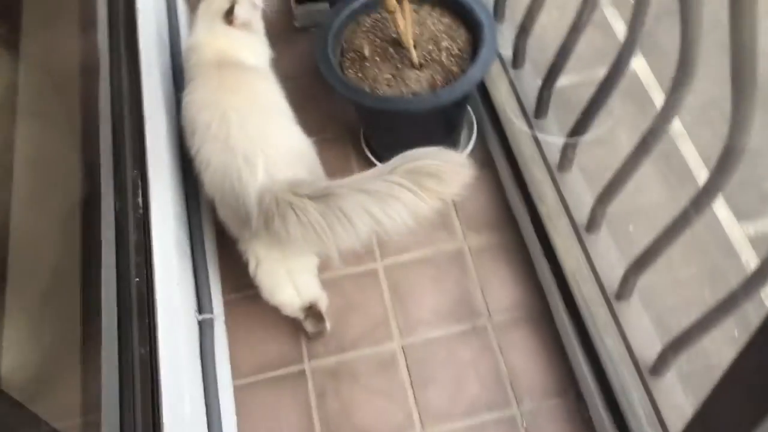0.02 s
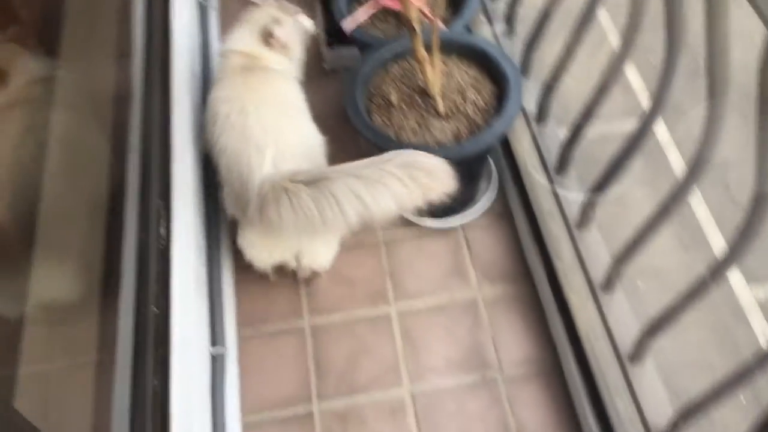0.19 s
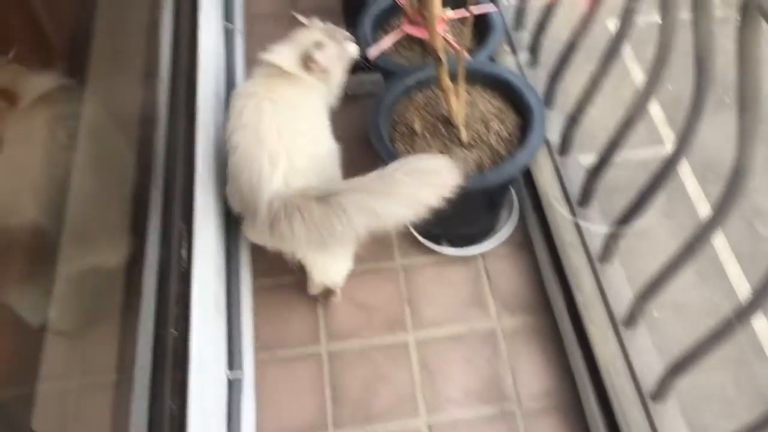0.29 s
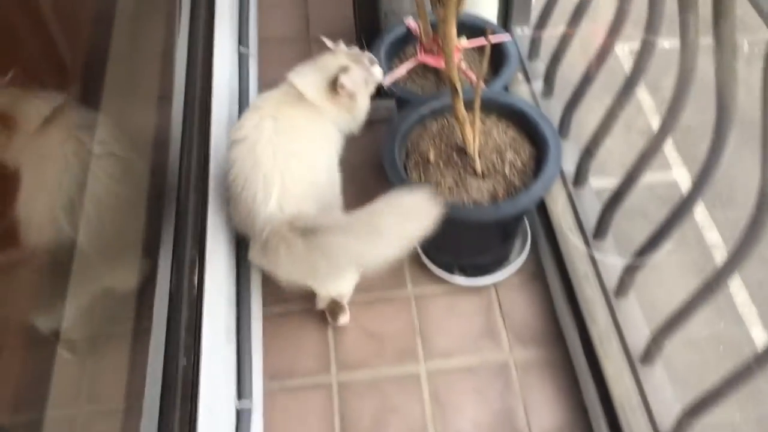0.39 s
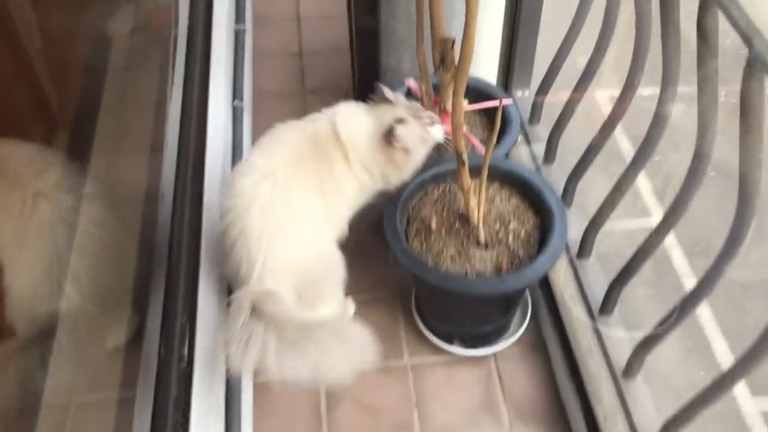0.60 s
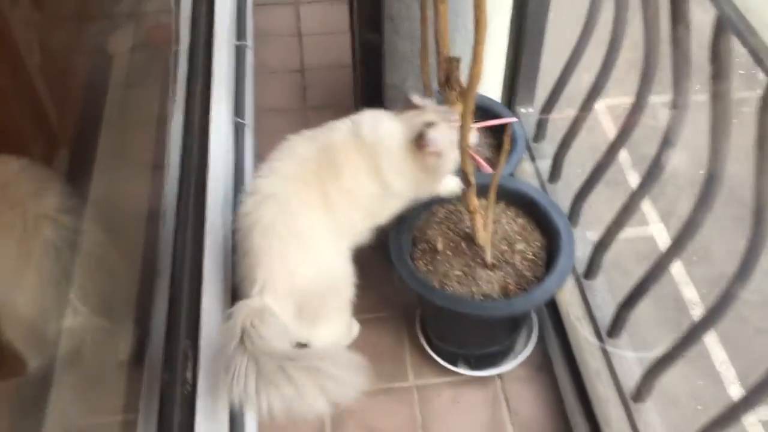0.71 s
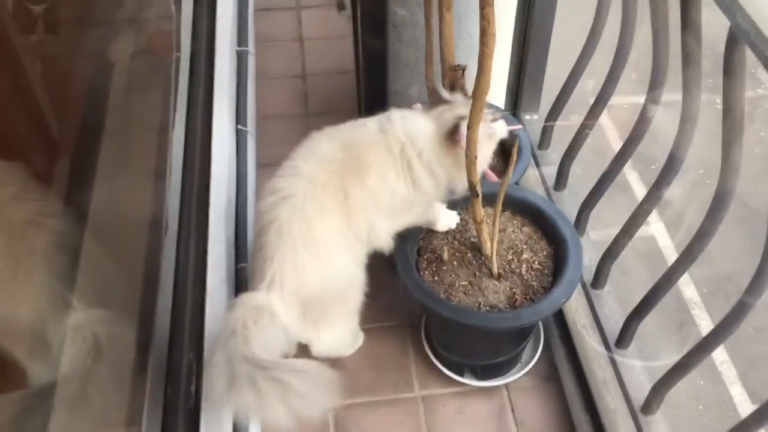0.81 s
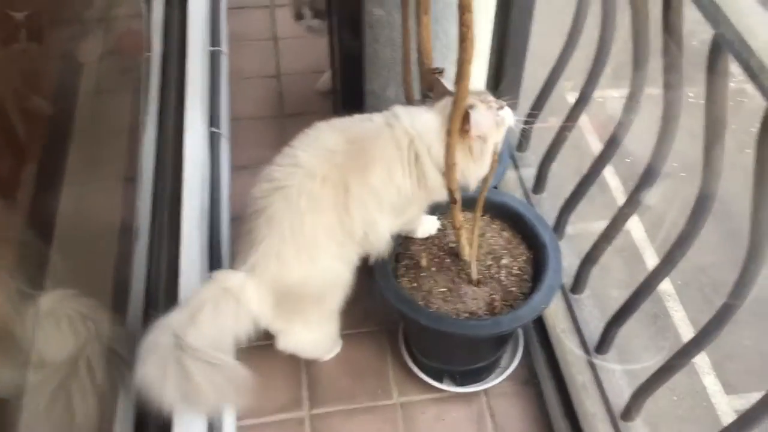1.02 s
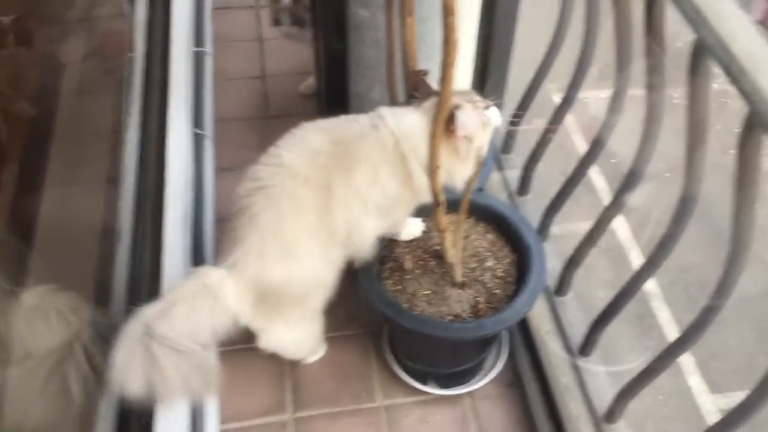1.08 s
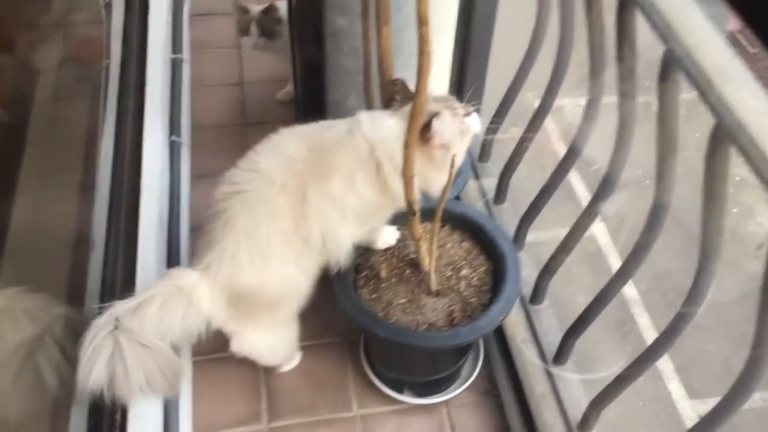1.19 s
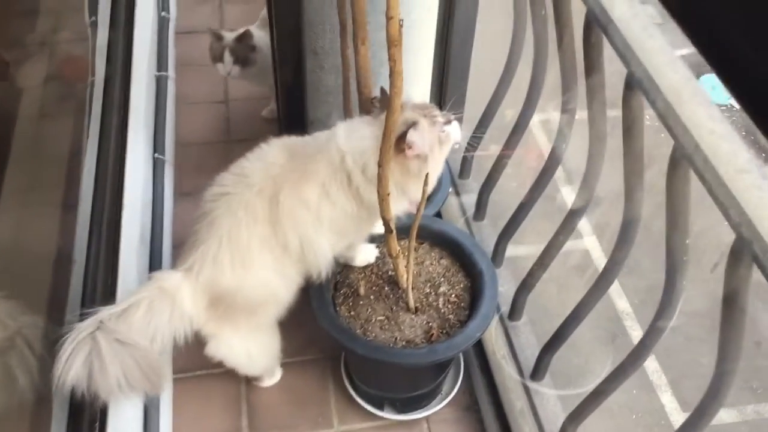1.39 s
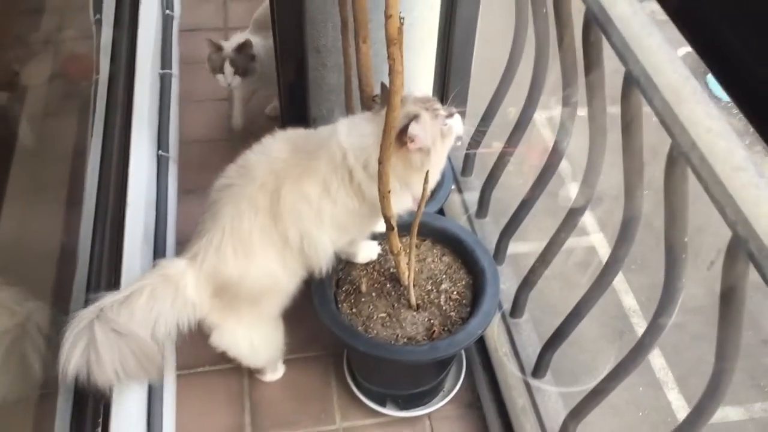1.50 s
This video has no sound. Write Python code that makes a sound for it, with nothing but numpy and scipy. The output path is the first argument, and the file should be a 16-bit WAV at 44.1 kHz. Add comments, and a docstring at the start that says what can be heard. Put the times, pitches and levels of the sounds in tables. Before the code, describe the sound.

A cat meows once from about 0.15 to 0.7 seconds, a gravelly chirp rising into a bright wavering tone. Scuffs on tiles and a tiny tick open the moment. A dull pot knock comes near 0.9, ticks at 1.07, a sharper double knock with a brushing scuff around 1.17, a faint metal railing rattle at 1.3, then tiny ticks. Low outdoor rumble and short balcony echoes throughout.

```python
"""Cat on a tiled balcony

A cat gives one meow: a gravelly rising chirp that clears into a wavering tone, made by adding up
14 harmonics and a thin hiss. Around it come scuffs on the tiles (shaped noise), dull knocks on a
plant pot and light touches on a railing (ringing tones), and ticks of twigs and grit (snaps of noise).
A low outdoor rumble and faint air noise lie underneath. Echoes follow all but the scuffs and outdoors.
"""
import sys
import numpy as np
from scipy import signal
from scipy.fft import rfft, irfft
from scipy.io import wavfile
from scipy.ndimage import uniform_filter1d

SR = 44100
rng = np.random.default_rng(int(sys.argv[2]) if len(sys.argv) > 2 else 0)


def waveform_to_disk(signal):
    """Save audio, clipped to [-1, 1], as 16-bit WAV at the path in sys.argv[1]."""
    frames = np.transpose(np.atleast_2d(signal))
    scaled = np.clip(frames, -1, 1) * 32767
    samples = np.round(scaled).astype(np.int16)
    wavfile.write(sys.argv[1], SR, samples)


N = 66150
T = np.arange(N) / SR  # time of every sample, s

# Colour of the outdoor rumble: [f/Hz, relative level/dB]
RUMBLE_COLOUR = [(20, -14.5), (36, -6.5), (60, 1), (90, -1.5), (125, -8), (190, -19.5), (290, -23.5),
                 (450, -35.5), (1000, -47), (3000, -58)]
# Rumble over time, before its random sway: [t/s, level/dB]
RUMBLE_LEVEL = [(0, -54), (.35, -54.5), (.62, -49.5), (1.3, -51), (1.5, -56)]
# Colour of the faint air noise: [f/Hz, relative level/dB]
AIR_COLOUR = [(100, -9), (500, -3.5), (1200, 0), (2500, -4.5), (4500, -8), (8000, -15), (15500, -19)]
RUMBLE_SWAY_DB, AIR_DB = 1.0, -67.5

# Scuffs on the tiles:
# [start t/s, attack/s, hold/s, time to fall 60 dB/s, level/dB, tilt/dB per octave]
SCUFFS = [(-.02, 0.0074, 0.041, 0.32, -49, 5), (0.044, 0.0077, 0.052, 0.16, -55, 3.5),
          (0.28, 0.016, 0.015, 0.063, -63.5, 7), (0.712, 0.038, 0.045, 0.36, -69, 7),
          (0.83, 0.0089, 0.01, 0.16, -59.5, 2), (0.889, 0.01, 0.063, 0.11, -59, 1),
          (1.049, 0.0042, 0.04, .12, -66, -1.5), (1.173, 0.048, 0.017, .18, -46.5, 6),
          (1.279, 0.0076, 0.025, 0.2, -55.5, -0.5), (1.38, 0.015, 0.016, 0.44, -67.5, 5.5)]
# Colour of the scuffs before the tilt: [f/Hz, relative level/dB]
SCUFF_COLOUR = [(150, 8), (400, -7.5), (900, 2.5), (2000, 7), (3800, -2), (6000, -6), (9000, -12),
                (11000, -17.5), (15500, -20)]

# Light touches on the railing: [t/s, level/dB]
CLINKS = [(1.29, -49), (1.297, -49.5), (1.306, -52.5), (1.321, -59)]
# Ringing tones of the railing: [f/Hz, relative level/dB, time to fall 60 dB/s]
RAIL_TONES = [(1789, 1.5, 0.1), (1865, -10, 0.14), (2143, -2.5, 0.094), (2420, -4.5, 0.046),
              (4000, -2, 0.024)]

# Light ticks of twigs and grit: [t/s, level/dB, centre f/Hz]
TICKS = [(.0563, -48.5, 1570), (0.0565, -43, 3270), (1.0684, -46, 2770), (1.072, -51, 3600),
         (1.0882, -46.5, 3520), (1.345, -55.5, 3330), (1.395, -61, 2870), (1.437, -56.5, 2680),
         (1.482, -65.5, 3070)]
TICK_T60_S, TICK_TAIL_DB, TICK_TAIL_T60_S = .01, -15, .07
TICK_SPREAD = 0.19  # band edges: centre divided and multiplied by 1.19

# Knocks on the plant pot: [t/s, level before softening/dB, softening cut-off f/Hz, pitch ratio]
KNOCKS = [(0.511, -53, 400, 0.73), (0.9073, -42.5, 2810, 0.78), (0.92, -51, 1190, 0.95),
          (1.1714, -36.5, 3430, 1), (1.202, -37.5, 520, 0.95)]
# Ringing tones of the pot at pitch ratio 1: [f/Hz, relative level/dB, time to fall 60 dB/s]
POT_TONES = [(201, -26, 0.049), (282.3, -6, 0.14), (376, 1, 0.048), (437, -0.5, 0.036), (662, -10, 0.082),
             (896, -6.5, 0.027), (1202, -9.5, 0.032), (1500, -3, 0.014), (1980, -3.5, 0.019),
             (2410, -13, 0.012)]
CRACK_DB, CRACK_T60_S = -3.5, 0.055

# Pitch of the meow, before smoothing and jitter: [t/s, f/Hz]
PITCH = [(.15, 285), (.192, 289.8), (.208, 391.5), (.243, 418.8), (.262, 504.6), (.295, 512.5),
         (.314, 577.4), (.358, 581.5), (.386, 611.2), (.412, 578.4), (.446, 610.9), (.46, 588.7),
         (.477, 502.6), (.496, 586), (.511, 603.8), (.537, 552.8), (.58, 569.6), (.605, 600.5),
         (.641, 589.5), (.655, 666)]
# Force of the voice, before VOICE_DB is added: [t/s, level/dB]
EFFORT = [(.13, -67), (.158, -52), (.183, -47), (.205, -48), (.243, -39.5), (.25, -35), (.284, -31.5),
          (.299, -41.5), (.345, -40), (.364, -43.5), (.388, -32), (.413, -41.5), (.448, -29.5), (.475, -42),
          (.518, -27.5), (.555, -35), (.59, -39), (.638, -44), (.668, -61), (.7, -70)]
# The mouth: [t/s, upper edge of the bright range f/Hz, nasal ring level/dB, roughness 0-1]
MOUTH = [(.15, 750, 4, 0.78), (.197, 675, 17.5, 0.54), (.228, 2340, -8.5, 0.44), (.252, 2860, 6, 0.39),
         (.283, 2430, 17, 0.2), (.34, 3020, -19, 0.08), (.39, 3130, 7, 0.04), (.45, 3250, 6, .04),
         (.478, 3340, -4.5, 0.18), (.512, 3790, 14.5, 0), (.545, 4140, 4.5, 0.22), (.59, 3472, -1.5, 0.16),
         (.65, 2758, -25, .14)]
# Colour given by the throat: [f/Hz, relative level/dB]
THROAT = [(280, -17.5), (420, -11.5), (580, -10.5), (780, -6.5), (1050, -4), (1350, -11.5), (1750, -2),
          (2300, -3.5), (2900, -5), (3450, -1), (4150, -5.5), (4800, -21.5), (6000, -5), (9000, -38.5)]
# Centre of the nasal ring, which climbs after the opening chirp: [t/s, f/Hz]
NASAL = [(.27, 2220), (.39, 2450)]
# High resonances of the head: [f/Hz, relative level/dB]
HEAD = [(4750, -1.5), (5350, -3), (6550, -17)]
# Strength of the head resonances over the call: [t/s, level/dB]
HEAD_LEVEL = [(.25, -55), (.32, -30), (.39, -22), (.46, -30.5), (.55, -14), (.625, -18), (.66, -30)]
# Colour of the thin hiss on the voice: [f/Hz, relative level/dB]
HISS_COLOUR = [(1500, -25), (3000, -11.5), (3900, 8), (4600, 1.5), (5600, -9.5), (8000, -24.5),
               (15000, -20.5)]
# Pitch shake as a share of the pitch (JITTER at full roughness); strength shake at full roughness
JITTER, CLEAN_JITTER, SHIMMER = 0.057, 0.0038, 0.79
RASP_DB, VOICE_DB, HISS_DB = -5, -2, -23
RASP_DOUBLES_HZ = 5000  # rasp grows with frequency and is twice as strong here
NASAL_WIDTH_HZ, HEAD_WIDTH_HZ = 910, 127  # from the centre to half height
EDGE_ORDER, EDGE_LEAK_DB = 12.6, -25.5  # steepness of the mouth's edge; what leaks past it

# Echoes off railing, door and walls, then a tail:
# [delay/s, time to fall 60 dB/s, level/dB, lower edge f/Hz, upper edge f/Hz]
ECHOES = [(.002, 0.043, -5, 900, 7400), (.008, .12, -3.5, 800, 6000), (0.018, .5, -10, 100, 3420)]
SMALL_WET_DB = -3  # echo level for knocks, ticks and clinks, compared with the meow
CUTOFF_HZ = 15850


def from_db(db):
    """Turn decibels into a multiplier."""
    return 10 ** (np.asarray(db) / 20)


def rms_one(x):
    """Scale to an average power of 1."""
    return x / np.sqrt(np.mean(x ** 2) + 1e-20)


def in_time(rows):
    """Draw straight lines between a table's points, giving one curve per column."""
    s, *columns = np.transpose(rows)
    return [np.interp(T, s, column) for column in columns]


def at_hz(points, hz):
    """Read a colour table at any frequency, on a log-frequency axis."""
    f, db = np.transpose(points)
    return np.interp(np.log(np.maximum(hz, 1)), np.log(f), db)


def noise(colour, tilt_db=0):
    """Make noise of power 1 by weighting the frequencies of white noise; tilt is per octave."""
    hz = np.maximum(np.arange(N // 2 + 1) * SR / N, 1)
    # The tilt begins at the table's second frequency
    octaves = np.log2(np.maximum(hz, colour[1][0]))
    gain = from_db(at_hz(colour, hz) + tilt_db * octaves) * (hz > 20)
    spectrum = rfft(rng.standard_normal(N))
    return rms_one(irfft(spectrum * gain, N))


def lowpass(x, hz):
    """Gently remove what lies above a frequency."""
    return signal.sosfilt(signal.butter(2, min(hz, SR / 2 - 1), fs=SR, output="sos"), x)


def flutter(hz):
    """Random motion, mostly slower than the given rate, with a spread of 1."""
    # One point every 20 samples is enough; the first half lets the filter settle
    smoother = signal.butter(2, min(hz, 1000), fs=SR / 20, output="sos")
    slow = signal.sosfilt(smoother, rng.standard_normal(N // 10))[-(N // 20):]
    return np.interp(np.arange(N) / 20, np.arange(len(slow)), rms_one(slow))


def dying(start, t60):
    """Start at once at full strength, then fall by 60 dB in every t60 seconds."""
    return (T >= start) * np.exp(-np.log(1000) * np.clip((T - start) / t60, 0, 10))


def struck(start, tones):
    """One blow sets several fading tones ringing, each slightly varied in strength."""
    out = 0
    for k, (hz, db, t60) in enumerate(tones):
        strength = (-1) ** k * from_db(db + rng.normal(0, 1))  # every other tone is flipped
        out = out + strength * dying(start, t60) * np.sin(2 * np.pi * hz * (T - start))
    return out


def bell(hz, centre_hz, width_hz):
    """Shape of a resonance: 1 at its centre, less on either side."""
    return 1 / (1 + ((hz - centre_hz) / width_hz) ** 2)


def outdoors():
    """Low rumble with a randomly swaying level, plus faint steady air noise."""
    rumble_db, = in_time(RUMBLE_LEVEL)
    rumble = from_db(rumble_db + RUMBLE_SWAY_DB * flutter(hz=4.9)) * noise(RUMBLE_COLOUR)
    return rumble + from_db(AIR_DB) * noise(AIR_COLOUR)


def scuffs(grain_db=1.5):
    """Rubbing on the tiles is noise that swells, holds and fades, with a gritty shake in level."""
    out = 0
    for s, attack, hold, release, db, tilt_db in SCUFFS:
        swell = np.clip((T - s) / attack, 0, 1)
        fade = np.exp(-np.log(1000) * np.maximum(T - s - attack - hold, 0) / release)
        out = out + from_db(db) * swell * fade * noise(SCUFF_COLOUR, tilt_db)
    return out * from_db(grain_db * flutter(hz=407))


def clinks():
    """Light touches set the metal railing ringing in a faint rattle."""
    return sum(from_db(db) * struck(s, RAIL_TONES) for s, db in CLINKS)


def ticks():
    """Twigs and grit make tiny snaps of noise in one band, each with a faint rattle after it."""
    out = 0
    for s, db, hz in TICKS:
        edges = [hz / (1 + TICK_SPREAD), hz * (1 + TICK_SPREAD)]
        band = signal.butter(2, edges, "band", fs=SR, output="sos")
        grain = rms_one(signal.sosfilt(band, rng.standard_normal(N)))
        snap = dying(s, TICK_T60_S)
        rattle = from_db(TICK_TAIL_DB) * dying(s, TICK_TAIL_T60_S)
        out = out + from_db(db) * grain * (snap + rattle)
    return out


def knocks():
    """A blow on the pot gives a short noisy crack and ringing tones, dulled by a soft contact."""
    out = 0
    for s, db, cut_hz, ratio in KNOCKS:
        ring = struck(s, [(hz * ratio, tone_db, t60) for hz, tone_db, t60 in POT_TONES])
        crack = from_db(CRACK_DB) * dying(s, CRACK_T60_S) * rng.standard_normal(N)
        out = out + from_db(db) * lowpass(ring + crack, cut_hz)
    return out


def meow():
    """Vocal folds make harmonics, throat and mouth shape them; roughness adds shaking and rasp."""
    (pitch,), (effort_db,), (edge, nasal_db, rough) = in_time(PITCH), in_time(EFFORT), in_time(MOUTH)
    (nasal_hz,), (head_db,) = in_time(NASAL), in_time(HEAD_LEVEL)
    shake = (CLEAN_JITTER + JITTER * rough) * flutter(hz=158)
    pitch = uniform_filter1d(pitch, size=400) * (1 + shake)
    phase = 2 * np.pi * np.cumsum(pitch) / SR
    voice, power = 0, 0
    for k in range(1, 15):
        hz = k * pitch
        throat = from_db(at_hz(THROAT, hz) + nasal_db * bell(hz, nasal_hz, NASAL_WIDTH_HZ))
        # The mouth lets through what lies below its edge, plus a weak leak
        below_edge = 1 / np.sqrt(1 + (hz / edge) ** (2 * EDGE_ORDER))
        leak = from_db(EDGE_LEAK_DB) * np.sqrt(bell(hz, 0, edge))
        head = sum(from_db(head_db + db) * bell(hz, centre, HEAD_WIDTH_HZ) for centre, db in HEAD)
        gain = throat * (below_edge + leak) + head
        # The complex rasp shakes both the strength and the phase of the harmonic
        rasp_size = from_db(RASP_DB) * rough * (1 + (hz / RASP_DOUBLES_HZ) ** 2)
        rasp = rasp_size * (flutter(hz=234) + 1j * flutter(hz=240))
        turning = np.exp(1j * (k * phase + rng.uniform(0, 2 * np.pi)))
        voice = voice + gain * np.real((1 + rasp) * turning)
        power = power + gain ** 2 / 2
    # Hiss is strongest when the mouth's bright range reaches highest
    hiss = from_db(HISS_DB) * noise(HISS_COLOUR) * (edge / edge.max()) ** 2
    sounding = (T > EFFORT[0][0]) & (T < EFFORT[-1][0])
    level = sounding * from_db(effort_db + VOICE_DB) * (1 + SHIMMER * rough * flutter(hz=110))
    # Dividing by the harmonics' power lets the effort curve set the loudness
    return level * (voice / np.sqrt(power) + hiss)


def balcony(x, wet_db=0):
    """Surfaces scatter sound back: add fading bursts of echoes, each later and duller."""
    response = 0
    for delay, t60, db, low_hz, high_hz in ECHOES:
        band = signal.butter(2, [low_hz, min(high_hz, SR / 2 - 1)], "band", fs=SR, output="sos")
        fade = dying(delay, t60)
        burst = signal.sosfilt(band, rng.standard_normal(N) * fade)
        response = response + from_db(db + wet_db) * burst / np.sqrt(np.sum(fade ** 2))
    return x + signal.fftconvolve(x, response[:N // 2])[:N]


def scene():
    """Add the background, the scuffs, the small noises and the meow into one channel."""
    small_noises = balcony(knocks() + ticks() + clinks(), SMALL_WET_DB)
    return (outdoors() + scuffs() + small_noises + balcony(meow()))[None]


def record(dry):
    """Cut the top of the treble steeply."""
    return signal.sosfilt(signal.ellip(12, .1, 70, CUTOFF_HZ, fs=SR, output="sos"), dry)


dry = scene()
out = record(dry)
waveform_to_disk(out)
```